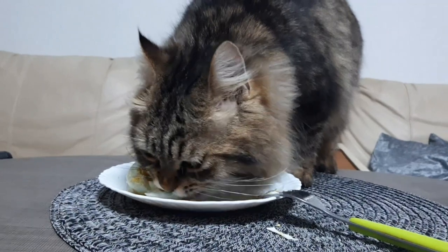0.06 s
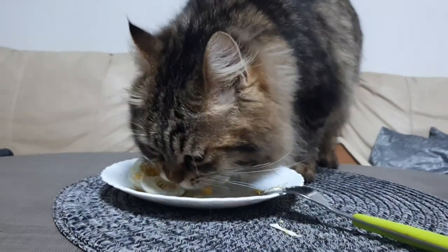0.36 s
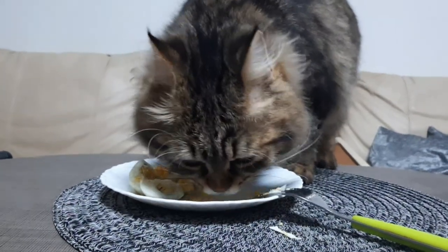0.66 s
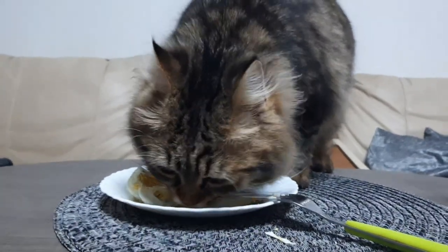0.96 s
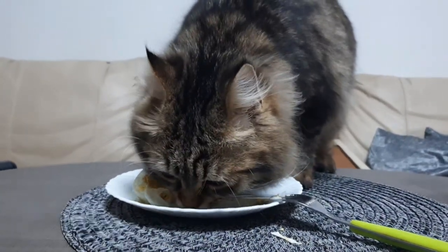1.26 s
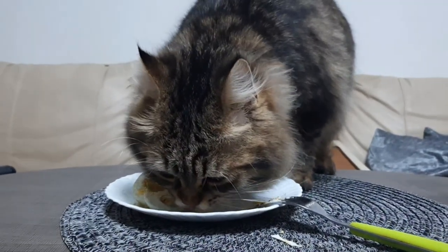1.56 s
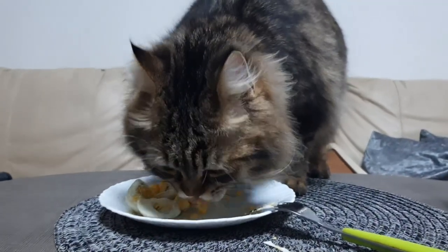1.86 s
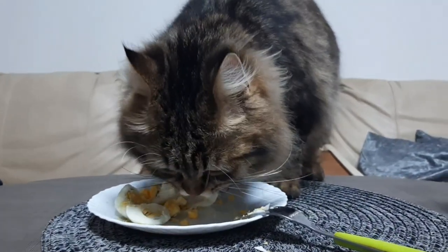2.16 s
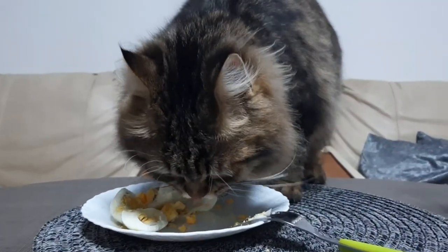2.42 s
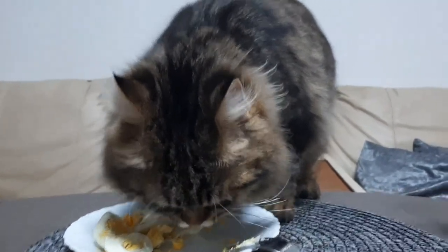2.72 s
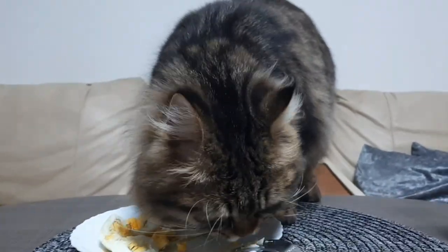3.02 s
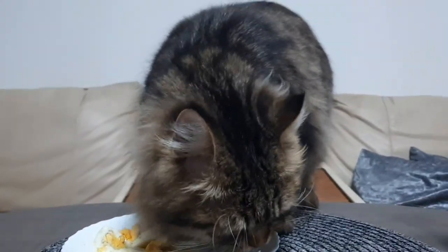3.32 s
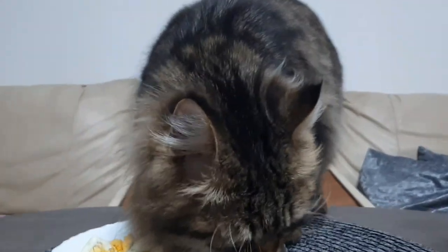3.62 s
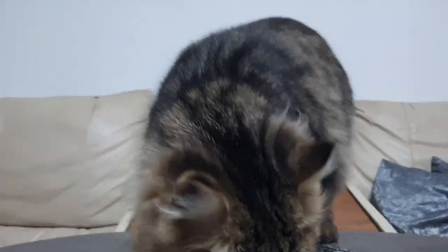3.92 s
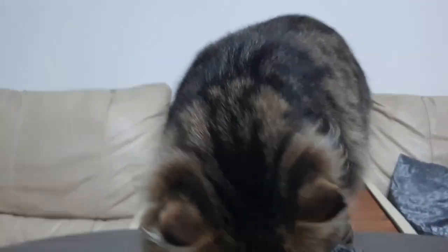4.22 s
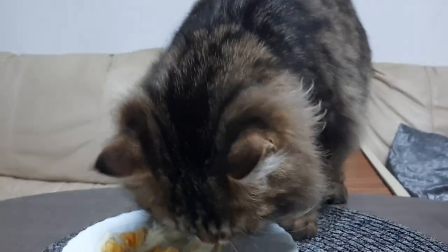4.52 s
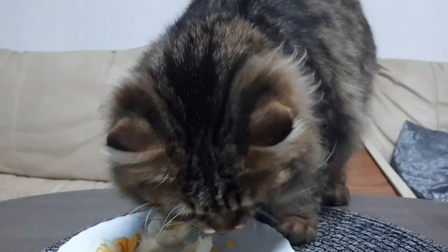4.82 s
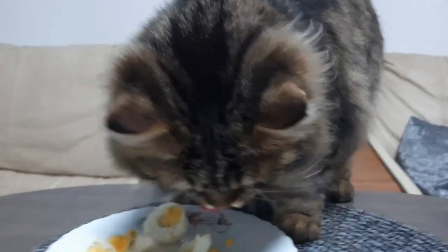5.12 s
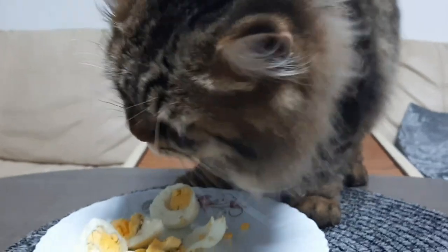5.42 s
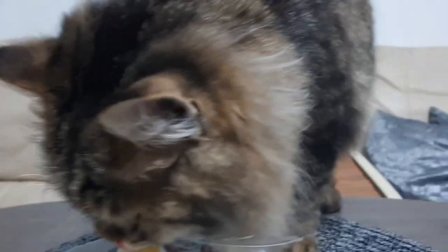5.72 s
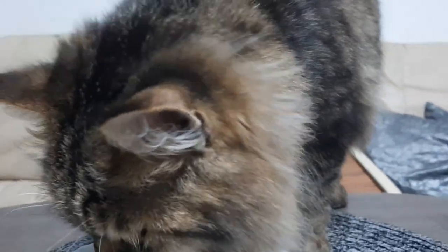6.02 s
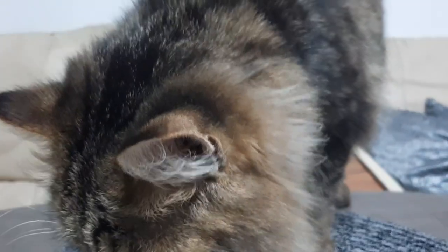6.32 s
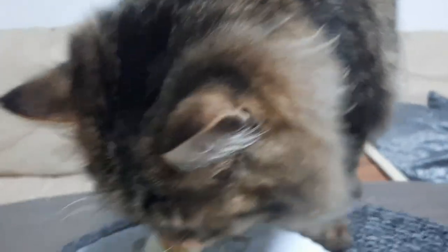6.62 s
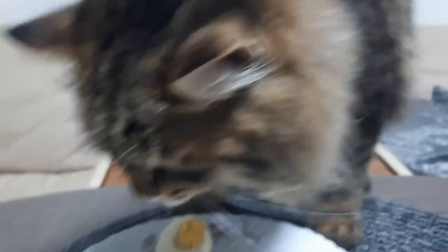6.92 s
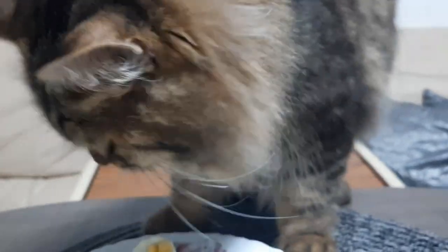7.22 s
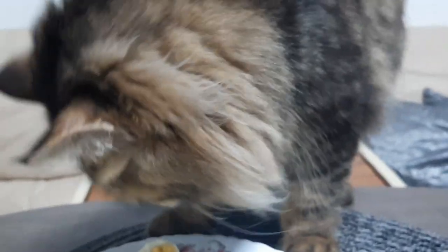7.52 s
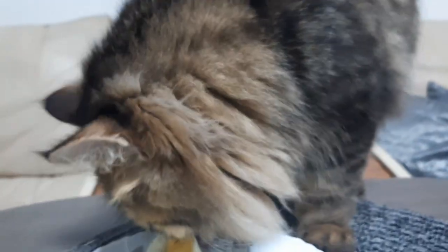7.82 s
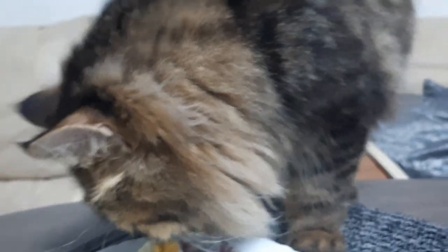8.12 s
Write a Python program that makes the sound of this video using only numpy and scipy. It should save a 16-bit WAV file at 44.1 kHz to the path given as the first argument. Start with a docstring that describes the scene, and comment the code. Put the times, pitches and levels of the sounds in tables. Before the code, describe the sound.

In a small room, fans give a steady, low, throbbing hum. A finger bumps the microphone and lifts off with a loud pop on the left. A cat licks and chews soft food with faint wet smacks as a low airy drone swells. In the second half a fork slides and chatters on the china plate, with one sharp ringing clink standing out and a few lighter ones after.

```python
"""A cat laps chopped egg from a china plate in a small living room, while two fans hum and beat.
At first a finger covers the left microphone port; at 0.8 s it lifts with a pop that ducks the gain.
From 2.5 s the cat chews with faint wet smacks, and soon a draught swells into a low duct drone.
From 4 s it nudges the plate: the fork on the rim slides, chatters and sets steel and china ringing,
with the loudest clink at 6.6 s."""
import sys
import numpy as np
from scipy import signal
from scipy.fft import rfft, irfft, next_fast_len
from scipy.io import wavfile
from scipy.ndimage import minimum_filter1d

SR = 44100
rng = np.random.default_rng(int(sys.argv[2]) if len(sys.argv) > 2 else 0)


def file_out(sig):
    """Save sig as 16-bit WAV at sys.argv[1]."""
    # one column per channel
    cols = np.atleast_2d(sig).T
    # limit, then scale
    lim = np.clip(cols, -1, 1)
    pcm = np.round(lim * 32767).astype(np.int16)
    wavfile.write(sys.argv[1], SR, pcm)


N = 368676
TIME = np.arange(N) / SR


# fork hits on the rim: (time [s], clash level [dB], low plate mode [dB re clash],
# fork ring [dB re clash], treble lift [dB], chatter time [s])
FORK_HITS = [(4.036, -53, 7, 4, -16, 0.018), (4.067, -47.5, 6, -6, -6.5, 0.004),
             (4.235, -36, 8.5, 2, -1, 0.011), (4.2614, -40, 5.5, 3, -3, 0.023),
             (4.328, -40.5, 6.5, -9, -10, 0.0075), (4.793, -51, -10, -11, -21, 0.0076),
             (4.862, -31, -9, -4, -9.5, 0.0044), (4.893, -40, 1, -14, -2, 0.0077),
             (4.9332, -26.5, -8.5, -6.5, -3.5, 0.011), (5.0005, -41, -9, -12, -3, 0.018),
             (5.017, -40, -9, -8, -5, .007), (5.0618, -37, -16, -4.5, -7.5, 0.0058),
             (6.5526, -15, -8.5, -13, 3, .009), (7.522, -22.5, 4, -13, 1.5, 0.01),
             (7.527, -25.5, 7, -8.5, -6, .015), (7.8351, -31.5, 1.5, -15, -8, 0.011),
             (7.8411, -33.5, -3.5, -20, -13, 0.007), (8.107, -48, 9, -0.5, -17, 0.014),
             (8.1276, -41, -1.5, -6, -3, .012), (8.3017, -55, 3, -1.5, -28, 0.0073)]
# the plate's lowest mode, split in two, damped by food and mat: (pitch [Hz], level [dB], t60 [s])
PLATE_LOW_MODES = [(2047, 1, .095), (2085, -4, .05)]
# the bright ring of the china: (pitch [Hz], level [dB], t60 [s])
PLATE_HIGH_MODES = [(3480, -12, 0.26), (3558, -12.5, .13), (5400, -13.5, .09), (5280, -9, 0.063),
                    (5850, -9.5, 0.11), (6860, -14.5, 0.085), (8230, -21.5, .13), (8400, -16.5, 0.051),
                    (9900, -18.5, 0.085), (10709, -21.5, .11), (12300, -20, .12), (11900, -8, 0.092)]
# the steel ring of the fork: (pitch [Hz], level [dB], t60 [s])
FORK_MODES = [(1343, -6, 0.065), (3058, 0.5, 0.051), (4106, 4.5, 0.071), (6530, -11.5, 0.076),
              (6890, -11, 0.14), (11200, -14, .1)]

def clinks():
    """The fork buzzes against the rim for a few milliseconds, then plate and fork ring on."""
    out, t = np.zeros((2, N)), TIME[:SR // 3]
    bloom = 1 - np.exp(-t / 0.0027)  # the lowest mode builds up while the fork chatters
    for s, clash_db, plate_db, fork_db, treble_db, chatter_s in FORK_HITS:
        chatter = np.exp(-(t / chatter_s) ** 2)
        buzz_tail = from_db(-14.5 - 60 * t / 0.15)
        envelope = (chatter + buzz_tail) * (1 - np.exp(-t / 0.0026))
        buzz = clash(stereo_noise(-0.31, size=len(t)), treble_db) * envelope * pan_db(0.2, 2.2)
        body = from_db(plate_db) * rings(t, PLATE_LOW_MODES, 0, right_lag_rad=1.86) * pan_db(-0.8, 0.8)
        china = from_db(-0.5) * rings(t, PLATE_HIGH_MODES, treble_db)
        steel = from_db(fork_db) * rings(t, FORK_MODES, treble_db)
        attack = 1 - np.exp(-t / (0.15 * chatter_s))
        add(out, s, from_db(clash_db) * (buzz + body * bloom + (china + steel) * attack))
    return out


# clusters of close, damped modes of fork and plate together: (centre [Hz], width [Hz], level [dB])
CLASH_BANDS = [(1100, 500, -18.5), (1575, 120, -3.5), (2040, 99, 0), (2480, 200, -2.5), (3430, 130, 2),
               (4060, 210, 0), (4710, 230, -8), (5325, 170, 0.5), (5720, 75, 0.5), (6626, 95, 0.5),
               (7100, 200, -15), (8200, 180, -5.5), (9940, 100, -7.5), (10500, 200, -11.5),
               (11620, 150, -7), (12600, 220, -9.5), (13450, 220, -10.5), (14650, 270, -12),
               (15600, 150, -18.5)]

def clash(contact, treble_db):
    """Contact noise takes on the metallic colour of the mode clusters; rms 1."""
    f = np.geomspace(400, 17000, 600)
    bands = sum(from_db(db) ** 2 * np.exp(-.5 * ((f - hz) / width) ** 2) for hz, width, db in CLASH_BANDS)
    gain = np.sqrt(from_db(-20) ** 2 + bands) * brightness(f, treble_db)
    return colour(contact, np.c_[f, 20 * np.log10(gain)])


def rings(t, modes, treble_db, scatter_db=2.0, right_lag_rad=1.77):
    """Modes ring out after one touch; each reaches the two ports with its own strength and phase."""
    out = 0
    for hz, db, t60 in modes:
        gain = from_db(db + rng.normal(0, scatter_db, (2, 1))) * brightness(hz, treble_db)
        phase = rng.uniform(0, 2 * np.pi) - np.array([[0], [right_lag_rad + rng.normal(0, .15)]])
        out = out + gain * ring(t, hz, t60, phase)
    return out


def brightness(hz, treble_db):
    """A harder touch lifts the modes above 7 kHz."""
    return from_db(treble_db * np.interp(hz, [7000, 11000], [0, 1]))


# the fork skids on the glaze: (time at full speed [s], relative level [dB], hold [s])
FORK_SLIDES = [(4.05, -56, 0.038), (4.7, -64, 0.21), (4.89, -46, 0.067), (5.05, -55, .04),
               (8.04, -59.5, 0.069), (8.12, -47.5, 0.045), (8.22, -65, 0.16)]
SLIPS_PER_S, SLIP_SPREAD_DB = 1100, 2

def slides():
    """Tiny, uneven slips of steel on glaze rasp and keep the modes faintly ringing."""
    t = TIME[:SR // 4]
    sizes = from_db(SLIP_SPREAD_DB * rng.standard_normal(N)) * rng.standard_normal((2, N))
    slips = rms_one((rng.random(N) < SLIPS_PER_S / SR) * sizes)
    speed = swells(FORK_SLIDES, rise_db_per_s=598, fall_db_per_s=198.5)
    china = rings(t, PLATE_LOW_MODES, 0) + 0.73 * rings(t, PLATE_HIGH_MODES, treble_db=-8)
    body = rms_one(china + 0.5 * rings(t, FORK_MODES, 0)) / np.sqrt(len(t))
    ringing = signal.fftconvolve(speed * slips, body, axes=1)[:, :N]
    rasp = speed * clash(slips, treble_db=-5.5)
    return (0.6 * ringing + 0.63 * rasp) * pan_db(-2.5, 1.5)


# the clearest wet smacks of tongue and jaw: (time [s], peak [dB], centre [Hz], decay [s])
WET_SMACKS = [(0.735, -46.5, 1510, 0.053), (0.993, -57, 11900, 0.0092), (2.527, -57, 12200, 0.0031),
              (2.589, -53, 1480, .0097), (2.687, -57, 12750, 0.017), (3.046, -61, 11800, 0.0052),
              (5.421, -50.5, 2820, 0.0075), (5.504, -58, 4720, 0.024), (5.647, -43, 1060, 0.012),
              (5.88, -58, 13000, 0.0073), (7.402, -53, 13040, .002)]

def smacks():
    """Films of saliva break in short bursts of crackle; slow licks swell more softly."""
    out, t = np.zeros((2, N)), TIME[:SR // 3]
    for s, db, hz, decay_s in WET_SMACKS + chew_smacks():
        crackle = stereo_noise(0.89, size=len(t)) * from_db(5.6 * rng.standard_normal(len(t)))
        envelope = np.exp(-t / decay_s) * (1 - np.exp(-t / (0.2 * decay_s)))
        burst = resonate(resonate(crackle * envelope, hz, .6 * hz), hz, .6 * hz)
        add(out, s, from_db(db) * burst / np.abs(burst).max())
    return out


# bouts of chewing: (start [s], relative level [dB], hold [s])
CHEW_BOUTS = [(2.5, -73.5, .7), (3.6, -75.5, .9), (4.6, -72, 1.514)]
BOUT_RISE_DB_PER_S, BOUT_FALL_DB_PER_S, STROKES_PER_S = 44.5, 89.5, 2.9

def chewing():
    """Soft egg is mashed with an airy rustle that swells with each jaw stroke, off to the right."""
    effort = swells(CHEW_BOUTS, BOUT_RISE_DB_PER_S, BOUT_FALL_DB_PER_S)
    pulse = from_db(1.5 * strokes() + 1.4 * drift(40))
    rustle = colour(stereo_noise(0.17), AIRY_EQ)
    return effort * pulse * rustle * pan_db(-5, 2.5)


def chew_smacks(peak_db=-68, centre_hz=5500, decay_s=0.008):
    """Faint smacks at the pace of the jaw, scattered in time, level and pitch: rows like WET_SMACKS."""
    times = np.concatenate([s + np.arange(0, hold_s, 1 / STROKES_PER_S) for s, _, hold_s in CHEW_BOUTS])
    scatter = rng.uniform(-1.7, 1, (len(times), 3))
    return [(s + .06 * late, peak_db + 4 * loud, centre_hz * 2 ** (1.2 * high), decay_s)
            for s, (late, loud, high) in zip(times, scatter)]


# bouts of lapping at the egg: (start [s], relative level [dB], hold [s])
LICK_BOUTS = [(0, -82.5, .55), (.68, -76.5, 0.09), (.95, -78.5, .35), (2.3, -90, 2.4), (4.6, -81, 0.97)]

def licking():
    """The rough tongue sizzles faintly in a narrow band, about three strokes a second."""
    tongue = strokes()
    sizzle = rms_one(resonate(resonate(stereo_noise(.5), 4700, 900), 4900, 900))
    effort = swells(LICK_BOUTS, BOUT_RISE_DB_PER_S, BOUT_FALL_DB_PER_S)
    return effort * from_db(2.0 * tongue + 1.1 * drift(35)) * sizzle * pan_db(-5, 1.5)


def strokes():
    """The to and fro of tongue or jaw, at a slightly wandering pace."""
    return np.sin(2 * np.pi * np.cumsum(STROKES_PER_S + .4 * drift(2)) / SR)


# a finger shifts on the left port, then pops off: (time [s], level [dB], start pitch [Hz], t60 [s])
FINGER_THUMPS = [(0.212, -23.5, 177, 0.098), (.349, -24, 108, 0.22), (.742, -28.5, 114, 0.29),
                 (0.8112, -7.5, 198, 0.12), (.83, 0, 1940, 0.037), (.84, -17, 1500, 0.013)]
PEEL_AT_S, PEEL_SWELL_S, PEEL_FADE_S, PEEL_DB = 0.8305, 0.0031, 0.0048, -25
# skin rubbing on the port: (frequency [Hz], level [dB])
SKIN_EQ = [(300, 3), (1700, 6.5), (3000, -2.5), (5500, -7), (8500, -37), (12000, -16.5), (16000, -19.5)]

def finger():
    """Skin sucks at the air in the port and lets go: diving thumps, a rustle, a brief ring of the port."""
    out, t = np.zeros(N), TIME[:SR // 5]
    for s, db, hz, t60 in FINGER_THUMPS:
        octave_drop_s = 0.019 * (200 / hz) ** 2  # sharper thumps dive faster
        cycles = hz * octave_drop_s * np.log1p(t / octave_drop_s)
        envelope = (1 - np.exp(-10 * hz * t)) * 1000 ** (-t / t60)
        add(out, s, -from_db(db) * np.sin(2 * np.pi * cycles) * envelope)
    add(out, PEEL_AT_S, from_db(-30.5) * ring(t, hz=1540, t60=0.041))
    since = TIME - PEEL_AT_S
    peel = np.exp(np.maximum(np.minimum(since / PEEL_SWELL_S, -since / PEEL_FADE_S), -20))
    rustle = from_db(PEEL_DB) * peel * colour(rng.standard_normal(N), SKIN_EQ)
    return (out + rustle) * pan_db(0, -34)


# blade tone of the slower fan: (time [s], pitch [Hz])
BLADE_PITCH = [(0, 92.65), (1.4, 92.5), (3.4, 90.44), (4, 94.3), (8.36, 95.38)]
# how far the faster fan sits above it: (time [s], detune [Hz])
BLADE_DETUNE = [(0, 6.38), (1, 6.52), (3, 6.53), (5.2, 6.25), (8.36, 5.62)]
# motor tones under the blades: (pitch [Hz], relative level [dB], waver [dB])
MOTOR_TONES = [(33.1, -20, 2), (62.7, -18, 2.5), (188, -32.5, 4)]
# thin whines on top: (pitch [Hz], relative level [dB])
WHINE_TONES = [(430.7, -55), (619, -68), (764, -69.5), (1150, -75.5), (1545, -71.5)]
# the thin whines sink a few decibels between 3.3 and 4.3 s: (time [s], gain [dB])
WHINE_FADER = [(3.3, -2), (4.3, -6)]

def fans():
    """Two blade tones beat about six times a second, over weak motor tones and whines."""
    cycles = np.cumsum(automation(BLADE_PITCH) + .9 * drift(3)) / SR
    beats = np.cumsum(automation(BLADE_DETUNE)) / SR
    slow_fan = np.sin(2 * np.pi * cycles)
    fast_fan = from_db(-4.3 + drift(2)) * np.sin(2 * np.pi * (cycles + beats))
    motor = sum(from_db(db + waver_db * drift(5)) * np.sin(2 * np.pi * np.cumsum(hz + 1.2 * drift(4)) / SR)
                for hz, db, waver_db in MOTOR_TONES)
    whine = sum(from_db(db) * rms_one(resonate(resonate(stereo_noise(0.077), hz, 20), hz, 20))
                for hz, db in WHINE_TONES)
    hum = from_db(-29.1) * (slow_fan + fast_fan) + from_db(-25.5) * motor
    return hum * pan_db(-2, 0) + from_db(automation(WHINE_FADER)) * whine


# three layers of moving air; the airy one also colours the chewing: (frequency [Hz], level [dB])
RUMBLE_EQ = [(20, -6), (45, 0), (80, 1), (165, 2), (235, -9), (400, -9.5), (520, -17.5), (700, -34)]
RUSH_EQ = [(330, -20.5), (520, 0.5), (780, 0), (1200, -8), (1600, -3.5), (2100, -20), (2800, -41)]
AIRY_EQ = [(1200, -18.5), (2000, 5), (2600, -2.5), (3500, -7.5), (5000, -14.5), (7000, -18)]
# fader rides of the draught and the midrange rush: (time [s], relative level [dB])
DRAUGHT_FADER = [(1.5, -73), (3.1, -67), (3.4, -51.5), (4.6, -50), (4.9, -47.5), (6.6, -50), (8.36, -48)]
RUSH_FADER = [(0, -57.5), (2.7, -59.5), (3.5, -65.5), (7.3, -63), (8.36, -58.5)]

def air():
    """A bed of rushing air; the draught drives a duct resonance and lifts the rumble with it."""
    draught_db = automation(DRAUGHT_FADER)
    rumble_db = -43 + 0.28 * (draught_db - draught_db.max())
    rumble = from_db(rumble_db) * colour(stereo_noise(0.81), RUMBLE_EQ)
    drone = from_db(draught_db + 1) * rms_one(resonate(resonate(stereo_noise(.93), 280, 22), 288, 38))
    rush = from_db(automation(RUSH_FADER) - 1.5 + drift(22)) * colour(stereo_noise(0.21), RUSH_EQ)
    airy = from_db(-81 + 0.68 * drift(11)) * colour(stereo_noise(0.24), AIRY_EQ)
    return (rumble + drone + rush + airy) * pan_db(-1, 0.8)


# the microphone's noise floor: (frequency [Hz], level [dB])
HISS_EQ = [(2000, -6.5), (5000, -3.5), (6500, -7), (8500, -11), (10500, -8), (12500, -2), (16000, -0.5)]

def microphone_hiss():
    """Steady, wide self-noise that the finger does not muffle."""
    return from_db(-76.5) * colour(stereo_noise(0.11), HISS_EQ) * pan_db(-1, 0.8)


def room(x, low_t60_s=0.33, high_t60_s=0.29):
    """Dense reflections off walls and sofa; the treble dies sooner."""
    t = TIME[:SR // 2]
    noise = stereo_noise(0, size=len(t))
    lows = signal.sosfilt(signal.butter(2, 6000, fs=SR, output="sos"), noise)
    tail = lows * from_db(-60 * t / low_t60_s) + 0.69 * (noise - lows) * from_db(-60 * t / high_t60_s)
    tail *= 1 - np.exp(-t / 0.0015)
    return signal.fftconvolve(x, tail / np.sqrt(np.sum(tail ** 2) / 2), axes=1)[:, :N]


THRESHOLD_DB, ATTACK_S, HOLD_S, RELEASE_DB_PER_S = -8, 0.044, 0.8, 14
LINGER_SHARE, CREEP_DB_PER_S = 0.38, 0.8

def gain_control(x):
    """A loud low thump ducks the gain; it holds, comes most of the way back, then creeps up the rest."""
    sidechain = signal.sosfilt(signal.butter(2, 1000, fs=SR, output="sos"), x)
    over_db = np.maximum(20 * np.log10(np.abs(sidechain).max(axis=0) + 1e-9) - THRESHOLD_DB, 0)
    half = int(HOLD_S * SR / 2)
    held_db = -minimum_filter1d(-over_db, 2 * half + 1, origin=half, mode="constant")
    release_db, creep_db = RELEASE_DB_PER_S * TIME, CREEP_DB_PER_S * TIME
    quick_db = np.maximum.accumulate(held_db + release_db) - release_db
    slow_db = np.maximum.accumulate(LINGER_SHARE * held_db + creep_db) - creep_db
    pole = np.exp(-1 / (ATTACK_S * SR))
    cut_db = signal.lfilter([1 - pole], [1, -pole], np.maximum(quick_db, slow_db))
    return x * from_db(-cut_db)


def from_db(db):
    """Decibels to gain."""
    return np.exp(np.log(10) / 20 * np.asarray(db))


def pan_db(left, right):
    """A gain for each channel."""
    return from_db([[left], [right]])


def rms_one(x):
    """Scale to unit power."""
    return x / np.sqrt(np.mean(x ** 2) + 1e-20)


def automation(points):
    """Straight ramps through (time, value) points."""
    return np.interp(TIME, *np.transpose(points))


def swells(rows, rise_db_per_s, fall_db_per_s):
    """Envelope of gestures that each rise, hold and fall."""
    shapes = [db - rise_db_per_s * np.maximum(s - TIME, 0)
              - fall_db_per_s * np.maximum(TIME - s - hold_s, 0) for s, db, hold_s in rows]
    return from_db(np.maximum(np.max(shapes, axis=0), -200))


def add(out, s, sound):
    """Mix a sound in at time s."""
    i = int(s * SR)
    out[..., i:i + sound.shape[-1]] += sound[..., :N - i]


def drift(rate_hz):
    """Random modulation; rms 1."""
    knots = rng.standard_normal(int(N / SR * rate_hz) + 3)
    return rms_one(np.interp(TIME * rate_hz, np.arange(len(knots)), knots))


def colour(x, eq):
    """Shape noise with an EQ curve; rms 1."""
    hz, db = np.transpose(eq)
    size = next_fast_len(x.shape[-1])
    f = np.maximum(np.fft.rfftfreq(size, 1 / SR), 1)
    gain = from_db(np.interp(np.log(f), np.log(hz), db, left=-90, right=-90))
    return rms_one(irfft(rfft(x, size) * gain, size)[..., :x.shape[-1]])


def stereo_noise(correlation, size=N):
    """White noise with a given left-right correlation."""
    mid, side = rng.standard_normal((2, size))
    return np.sqrt((1 + correlation) / 2) * mid + np.sqrt((1 - correlation) / 2) * side * [[1], [-1]]


def resonate(x, hz, width_hz):
    """One resonance with gain 1 at its peak."""
    r = np.exp(-np.pi * width_hz / SR)
    feedback = [1, -2 * r * np.cos(2 * np.pi * hz / SR), r * r]
    return signal.lfilter(np.array([1, 0, -1]) * (1 - r * r) / 2, feedback, x)


def ring(t, hz, t60, phase=0):
    """A dying sine."""
    return np.sin(2 * np.pi * hz * t + phase) * 1000 ** (-t / t60)


def scene():
    """The meal in its room over fans and air; the left port is covered until the finger lifts."""
    meal = clinks() + slides() + smacks() + licking() + chewing()
    covered = np.interp(TIME, [.81, .85], [1, 0]) * np.array([[1], [0]])
    meal_and_fans = (meal + from_db(-10) * room(meal) + fans()) * from_db(-17 * covered)
    air_bed = air() * from_db(-10.5 * covered)
    return meal_and_fans + air_bed + microphone_hiss() + finger()


def record(dry):
    """Gain control ducks after the pop, peaks clip at full scale, and the top is cut at 15.9 kHz."""
    high_cut = signal.ellip(10, .1, 80, 15900, fs=SR, output="sos")
    return signal.sosfilt(high_cut, np.clip(gain_control(dry), -1, 1))


dry = scene()
out = record(dry)
file_out(out)
```